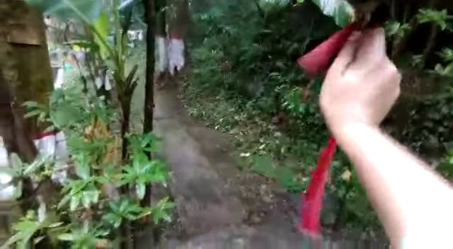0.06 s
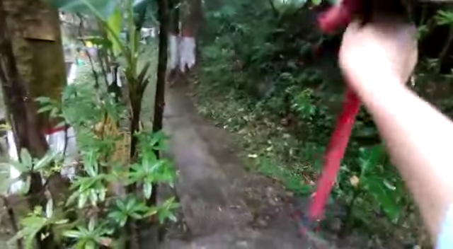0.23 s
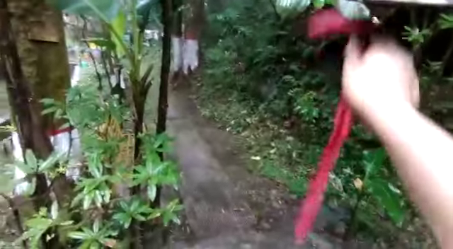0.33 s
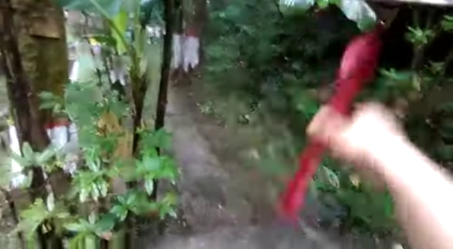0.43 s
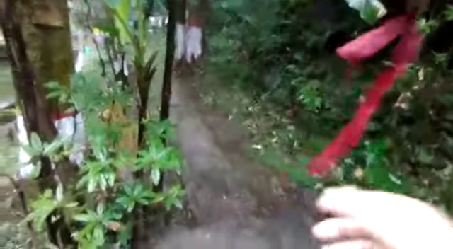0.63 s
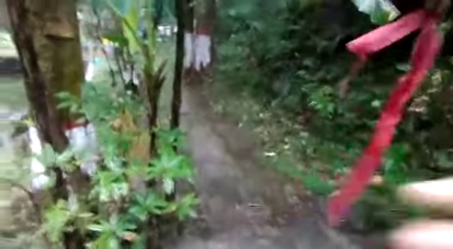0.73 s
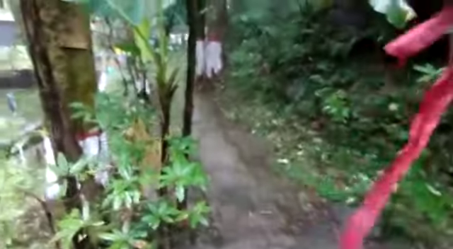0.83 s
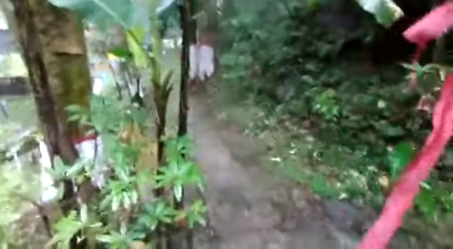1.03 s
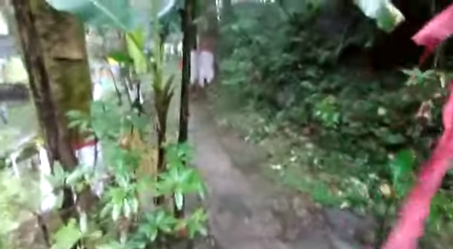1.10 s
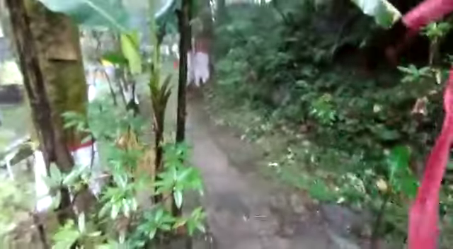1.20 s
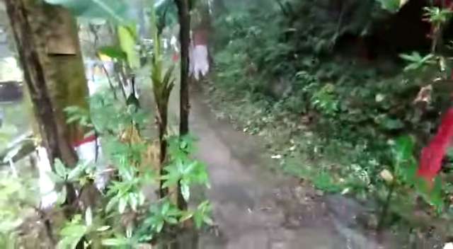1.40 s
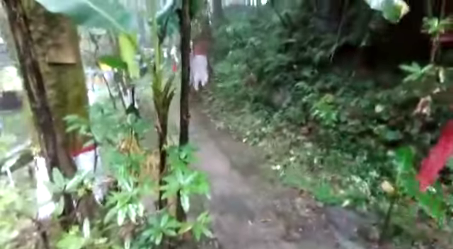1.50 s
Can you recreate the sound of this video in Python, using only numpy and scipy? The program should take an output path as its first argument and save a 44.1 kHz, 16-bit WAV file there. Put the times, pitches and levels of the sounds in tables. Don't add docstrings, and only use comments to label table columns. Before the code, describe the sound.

A small brass bell is struck once by hand, clinks and rattles, then rings out fading

```python
import sys
import numpy as np
from scipy import signal
from scipy.fft import rfft, irfft
from scipy.io import wavfile
from scipy.ndimage import uniform_filter1d

SR = 44100
rng = np.random.default_rng(int(sys.argv[2]) if len(sys.argv) > 2 else 0)


def level_to_linear(level):
    exponent = np.asarray(level, float) / 20
    return 10 ** exponent


def unload_audio(sound):
    columns = np.transpose(np.atleast_2d(sound))
    steps = np.round(np.clip(columns, -1, 1) * 32767)
    wavfile.write(sys.argv[1], SR, steps.astype(np.int16))


N = 68355

STRIKE_S, LEAN_S, LATE_BLOW_S = .2312, .319, .509
CAUGHT_DB = -7
WALL_T60_S, TOUCH_T60_S, GLIDE_S = 0.32, .04, .0075
CHATTER_PER_S, ROD_DB, HOOK_DB, GRIT_DB = 910, -9, -6.5, -5
AIR_DB, LEAVES_DB, LEAVES_T60_S, HALO_DB = -82.5, -27, 0.15, -27.5

# [f/Hz, density/dB per Hz]
AIR_SPECTRUM = [(30, -20), (200, -7), (700, -11.5), (1500, -5), (3300, -13), (3900, -15.5), (12700, -19),
                (13300, -33.5)]
# [t/s, level/dB]
FLOOR_DRIFT = [(0.049, 6), (0.081, -6), (0.219, 8), (.9, 2.5), (1.25, 1.5), (1.502, 0.5)]
# [t/s, peak level/dB, f/Hz, length/s]
TAPS = [(.019, -62, 1030, .007), (.02, -68, 2050, .006), (.038, -48.5, 59.4, .02), (.131, -65, 310, .008),
        (.143, -60, 206, .017), (.182, -56, 880, .007), (.183, -50, 1186, .0065), (.187, -59, 645, .0054),
        (.212, -58, 1150, .005), (.232, -51, 480, .0035), (.252, -58, 55, .04), (.468, -65.5, 50.5, .046),
        (.559, -67, 54.4, .023), (.666, -60.5, 56.7, .037), (.734, -69.5, 57.7, .039),
        (1.118, -64, 90, .03), (1.178, -62, 113, .016), (1.18, -65, 2838, .04), (1.254, -59, 117.5, .023),
        (1.286, -55, 55, .066)]
# [t/s, peak level/dB, start f/Hz, end f/Hz, t60/s]
THUMPS = [
    (1.096, -56.5, 580, 81, .1),
    (1.334, -36, 260, 48.65, .098),
]
# [t/s, peak level/dB, t60/s]
RUSTLES = [
    (1.091, -66, 0.22),
    (1.096, -58, .012),
    (1.332, -54, 0.018),
    (1.337, -70, 0.18),
]
# [f/Hz, level/dB]
CLOTH_SPECTRUM = [(300, 6.5), (1000, 2), (3000, -13), (6500, -21), (9500, -6.5), (15500, -5), (16400, -33)]
# [t/s, f/Hz, level/dB, t60/s, touched t/s]
LONE_PARTIALS = [(.288, 4802, -29, .6, .338), (.292, 5160, -40, .7, .362), (.296, 14787, -38, 1.2, .425),
                 (.319, 10387, -27, .25, .365), (.319, 11273, -28, .2, .37), (.319, 9598, -33, .3, .37),
                 (.319, 11440, -33, .25, .38), (.298, 10985, -36, .5, .37), (.331, 2608, -36, .3, .4),
                 (.336, 2305, -43, .4, .42), (.385, 12521, -41, .4, .43), (.509, 14783, -34, .25, .62),
                 (.509, 14662, -38, .35, .57), (.509, 1777, -47, .35, .59), (.509, 9598, -37, .15, .6),
                 (.509, 13671, -43, .2, .58), (.509, 11790, -44, .2, .58), (.529, 5157, -44, .25, .6),
                 (.535, 15072, -42, .2, .6)]
# [t/s, level/dB]
KNOCKS = [(0.319, -48.5), (.331, -35), (.342, -39.5), (.356, -55), (.368, -45), (.382, -63), (0.391, -55),
          (.400, -48.5), (0.406, -58), (.5095, -40), (0.521, -42), (0.53, -47.5), (0.541, -58),
          (.547, -41.5), (0.555, -55), (.566, -50), (0.575, -57), (.647, -57.5)]
# [f/Hz, level/dB, t60/s]
SOCKET = [(790, -8.5, 0.03), (973.5, 6, 0.014), (1050, -0.5, 0.024), (1390, -8, .014)]
ROD_HZ = [942, 1120, 1777, 2310, 2612, 3100, 5160, 5610, 7640, 8045, 8385, 8530]
# [level/dB, t60/s]
ROD = [(-15, 0.1), (-12, 0.05), (-3, 0.025), (-3.5, 0.017), (-9.5, 0.067), (-12, 0.085), (-9, 0.11),
       (-7.5, .07), (-17.5, 0.15), (-8, 0.073), (-10, 0.085), (-7, 0.13)]
HOOK_HZ = [9390, 9600, 10173, 10384, 10585, 10700, 10960, 11275, 11445, 11812, 12520, 13665]
# [level/dB, t60/s]
HOOK = [(-6, 0.1997), (-4, .12), (-9.5, 0.2), (7.5, 0.1), (0, .1), (-7, 0.15), (-3, .12), (0.2, 0.2),
        (-4.5, 0.14), (-6, 0.12), (-12.5, 0.15), (-12.5, 0.11)]
# [t/s, rod low modes/dB, rod high modes/dB, hook/dB, bare tick/dB]
CLINKS = [(.2312, -53, -46, -32.5, -19.5), (0.244, -41, -32, -41, -29), (0.289, -54.5, -38, -69.5, -55),
          (0.3, -57, -57, -34, -55.5), (.3190, -57, -65, -24.5, -40.5), (.3310, -34, -30, -53, -73.5),
          (.3430, -38.5, -52, -42, -44), (.3560, -37.5, -30.5, -57, -34), (0.368, -59, -36, -43.5, -75),
          (0.389, -60, -35, -54, -40), (.4020, -50, -44, -59, -30.5), (.5092, -65, -35.5, -67, -35),
          (.5295, -37.5, -71, -37, -55)]
# [t/s, level/dB, extra on low modes/dB]
CHATTER = [(0.231, -63, -1), (0.269, -49, -15), (.3, -41.5, -13.5), (0.333, -40, -2.5), (0.412, -47.5, -4),
           (0.469, -102, 21), (0.506, -87, -5), (0.511, -30.5, -18.5), (0.541, -34.5, -16),
           (0.599, -72, -16), (.7, -100, 1)]
# [f/Hz, level/dB]
GRIT_SPECTRUM = [(400, -29), (900, -7), (2500, -12), (3500, -24), (5200, -9.5), (8500, -2.5), (15500, 0.5),
                 (16100, -30)]
RING_HZ = [1231.7, 1226.29, 2845.4, 2832.2, 3849, 3775, 4386, 4342, 4454, 4505, 6530, 6752, 1129, 1328]
# [peak level/dB, t60/s, signed side of nodal line, change at clapper lean/dB, late blow level/dB]
RING = [(-30, 2.39, 1, 0.5, -55.5), (-46, 5.7, -1.3, 0, -76), (-33.5, 1.3, 1, 1.5, -66),
        (-28, 1.6, -0.87, -5.5, -77), (-25.5, 0.5, 1, 1.5, -41.5), (-30, 0.57, 0.84, 0.5, -54),
        (-12, 0.83, 0.99, -1, -35.5), (-26, 0.72, -1.5, 0.5, -47.5), (-34, 0.82, 1, -1, -56.5),
        (-24.5, 0.66, 0.66, 0, -50.5), (-16.5, 0.64, 0.98, -0.5, -57), (-24.5, 0.3, 0.94, -4.5, -36),
        (-65, 5.8, 1, -1, -89.5), (-59, 3.2, 1, 4.5, -90.5)]
SHEEN_HZ = [7196, 7222, 9217, 9159, 10225, 10160, 12322, 12358, 13363, 15066, 9370, 8915]
# [peak level/dB, t60/s, signed side, change at clapper lean/dB, late blow level/dB]
SHEEN = [(-19.5, 0.22, 0.98, -5.5, -32.5), (-30, 0.5, 0.87, 0.5, -42), (-21.5, 0.34, 0.93, -15.5, -30.5),
         (-53.5, 0.6, 1, 17, -39), (-31.5, 0.3, 0.94, 6.5, -45), (-31, .2, -1.6, 0, -51),
         (-34.5, 0.49, 0.98, -5.5, -51), (-37, 0.5, -0.69, -4, -51), (-22.5, 0.3, 0.97, -4.5, -26),
         (-27, .3, 1, -1, -50), (-37.5, .3, 0.93, -1.5, -42), (-40.5, 0.21, 0.99, -0.5, -57)]
# [t/s, pairs re strike/dB, upper partials re strike/dB]
REBOUNDS = [
    (0.243, -14, -3),
    (0.53, -36, -51),
]
# [t/s, level/dB]
WALL_PUSHES = [
    (0.334, 11),
    (0.516, 0.33),
]
# [t/s, level/dB, shading above 4.5 kHz/dB per octave, extra above 3.5 kHz/dB]
BELL_TONE = [(.23, -0.3, 0.6, -0.05), (.3, -2.23, 2.5, 3.5), (0.379, -4.5, 7.5, 3), (0.439, 0.5, 4, -4.4),
             (0.498, -2, -15, -3.5), (0.53, -1.5, -0.5, -0.5), (.6, -1, -1.5, -5), (.74, -7, -46.5, 6),
             (0.879, -3.5, -67, 2.7), (1.3, -6, -51.5, 6.9)]
# [t/s, v/(m/s)]
SPEED = [(.38, 0), (.49, .25), (.53, .42), (.72, .44), (.88, .35), (1.1, .08), (1.3, -.2)]
# [t/s, shift f/Hz]
PULL = [(.32, 0), (.36, 3.5), (.41, 0), (.67, 0), (.72, -3.5), (.77, 0)]


def read(points, hz):
    f, value = np.transpose(points)
    return np.interp(np.log(hz + 1), np.log(f + 1), value)


def evened(x):
    return x / np.sqrt(np.mean(x ** 2) + 1e-20)


def coloured(points):
    gain = level_to_linear(read(points, np.fft.rfftfreq(N, 1 / SR)))
    return evened(irfft(rfft(rng.standard_normal(N)) * gain, N))


def after(s, t60):
    t = np.arange(N) / SR - s
    return (t >= 0) * level_to_linear(-60 * np.maximum(t, 0) / t60)


def modes(hz, db, t60, soft=0.00047):
    t = np.arange(12000)[:, None] / SR
    onset = np.minimum(t / soft, 1)
    return (level_to_linear(db - 60 * t / t60) * np.sin(2 * np.pi * hz * t) * onset).sum(axis=1)


def air():
    t = np.arange(N) / SR
    lumps = evened(uniform_filter1d(rng.standard_normal(N), size=1500))
    rumble = coloured([(25, -14), (55, -3.5), (150, -8.5), (300, -16.5), (600, -39.5)])
    level = level_to_linear(AIR_DB + np.interp(t, *np.transpose(FLOOR_DRIFT)))
    return level * coloured(AIR_SPECTRUM) + rumble * level_to_linear(-86 + 3.5 * lumps)


def taps():
    t, out = np.arange(N) / SR, np.zeros(N)
    for s, db, hz, length in TAPS:
        out += level_to_linear(db) * np.exp(-(2 * (t - s) / length) ** 2) * np.sin(2 * np.pi * hz * (t - s))
    return out


def thumps():
    t, out = np.arange(N) / SR, np.zeros(N)
    for s, db, hz, end_hz, t60 in THUMPS:
        u = np.maximum(t - s, 0)
        turns = end_hz * u + (hz - end_hz) * GLIDE_S * (1 - np.exp(-u / GLIDE_S))
        onset = np.minimum(u / 0.00068, 1)
        out -= level_to_linear(db) * after(s, t60) * np.sin(2 * np.pi * turns - 1.4) * onset
    return out


def cloth():
    t = np.arange(N) / SR
    sleeve = coloured([(150, -6.5), (1000, .5), (3200, 0), (4500, -39.5)])
    brush = level_to_linear(-69.5) * sleeve * np.exp(-((t - 1.177) / 0.0094) ** 2)
    bursts = sum(level_to_linear(db) * after(s, t60) for s, db, t60 in RUSTLES)
    return brush + coloured(CLOTH_SPECTRUM) * bursts


def leaves(x):
    tail = rng.standard_normal(N) * after(.006, LEAVES_T60_S)
    return signal.fftconvolve(x, tail[:SR // 2] / np.linalg.norm(tail))[:N]


def lone_partials():
    t, out = np.arange(N) / SR, np.zeros(N)
    for s, hz, db, t60, touched in LONE_PARTIALS:
        held = np.where(t < touched, 1, after(touched, TOUCH_T60_S))
        onset = np.clip((t - s) / 0.0031, 0, 1)
        out += level_to_linear(db) * after(s, t60) * held * onset * np.sin(2 * np.pi * hz * t)
    return out


def socket_knocks():
    out = np.zeros(N)
    hz, socket_db, t60 = np.transpose(SOCKET)
    spreads = rng.normal(1, .05, (len(KNOCKS), len(hz)))
    for (s, db), spread in zip(KNOCKS, spreads):
        out[round(s * SR) - 40:][:12000] += modes(hz * spread, db + socket_db, t60, soft=0.0018)
    return out


def clapper():
    t, draw = np.arange(N) / SR, rng.random((N, 3))
    s, level_db, low_db = np.transpose(CHATTER)
    hits = draw[:, 0] < CHATTER_PER_S / SR
    tiny = hits * level_to_linear(-3.6 * np.log(draw[:, 1] + 1e-3)) * np.sign(draw[:, 2] - .5)
    tiny = evened(tiny) * level_to_linear(np.interp(t, s, level_db)) * (t > STRIKE_S)

    hz = np.concatenate([ROD_HZ, HOOK_HZ])
    db, t60 = np.concatenate([ROD, HOOK]).T
    group = np.digitize(hz, [4000, 9000])
    out, grit = np.zeros(N), coloured(GRIT_SPECTRUM)
    for k, share_db in enumerate((np.interp(t, s, low_db), ROD_DB, HOOK_DB)):
        ring = modes(hz[group == k], db[group == k], t60[group == k])
        push = level_to_linear(share_db) * np.roll(tiny, 37 * k)
        out += signal.oaconvolve(push, ring / np.linalg.norm(ring))[:N]
    out += level_to_linear(GRIT_DB) * grit * np.sqrt(abs(uniform_filter1d(tiny ** 2, size=100)))

    jitters = rng.normal(0, 3, (len(CLINKS), len(hz)))
    for (s, *dbs, tick_db), jitter in zip(CLINKS, jitters):
        part = out[round(s * SR):][:12000]
        part += modes(hz, db + jitter + np.array(dbs)[group], t60)
        out += level_to_linear(tick_db) * grit * after(s, 0.027)
    return signal.sosfilt(signal.butter(2, 550, "high", fs=SR, output="sos"), out)


def bell():
    t, out = np.arange(N) / SR, np.zeros(N)
    s, level_db, shade, upper_db = np.transpose(BELL_TONE)
    shade, upper_db = np.interp(t, s, shade), np.interp(t, s, upper_db)
    doppler = 1 + np.interp(t, *np.transpose(SPEED)) / 343
    clock = np.cumsum((t >= STRIKE_S) * doppler) / SR
    pulled = np.cumsum(np.interp(t, *np.transpose(PULL))) / SR
    for freqs, table, col in ((RING_HZ, RING, 1), (SHEEN_HZ, SHEEN, 2)):
        for hz, (db, t60, side, lean_db, late_db) in zip(freqs, table):
            on_wall = hz == RING_HZ[2]
            power = after(STRIKE_S, t60) ** 2
            power = power + sum(level_to_linear(2 * r[col]) * after(r[0], t60) ** 2 for r in REBOUNDS)
            power = power * level_to_linear(2 * lean_db * (t > LEAN_S))
            power += (level_to_linear(late_db - db) * after(LATE_BLOW_S, t60)) ** 2
            power += on_wall * sum(level_to_linear(2 * d) * after(w, WALL_T60_S) ** 2 for w, d in WALL_PUSHES)
            power *= level_to_linear(-2 * CAUGHT_DB * (hz < 4000) * (t < REBOUNDS[0][0]))
            size, origin = (140, 69) if hz < 2000 else (40, 19)
            swell = uniform_filter1d(np.sqrt(power), size=size, origin=origin)
            tilt_db = upper_db * (hz > 3500) + shade * max(np.log2(hz / 4500), 0)
            tone = np.sin(2 * np.pi * (hz * clock + pulled * on_wall))
            out += side * level_to_linear(db + tilt_db) * swell * tone
    return out * level_to_linear(np.interp(t, s, level_db))


def scene():
    ring = bell()
    metal = ring + clapper() + lone_partials() + socket_knocks()
    halo = level_to_linear(HALO_DB) * ring * coloured([(1, -4.5), (150, -2.0), (400, -15), (900, -30.5)])
    echo = level_to_linear(LEAVES_DB) * leaves(metal)
    return (metal + halo + echo + taps() + thumps() + cloth() + air())[None]


def band_limit(x):
    return signal.sosfilt(signal.butter(12, 17140, fs=SR, output="sos"), x)


def record(dry):
    fade = np.clip((N - np.arange(N)) / SR / 0.027, 0, 1)
    mix = signal.oaconvolve(dry * fade, signal.firwin(255, 16000, fs=SR)[None], "same")
    return band_limit(mix)


dry = scene()
out = record(dry)
unload_audio(out)
```